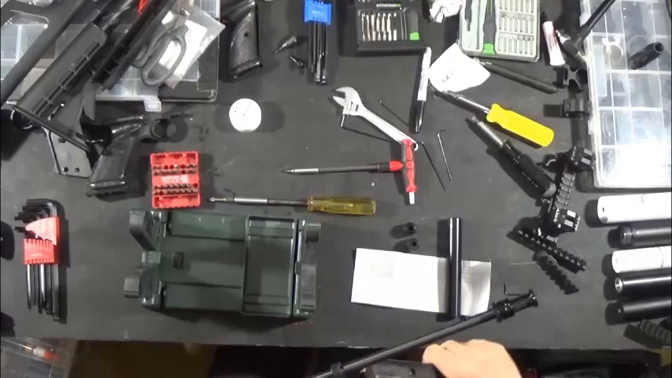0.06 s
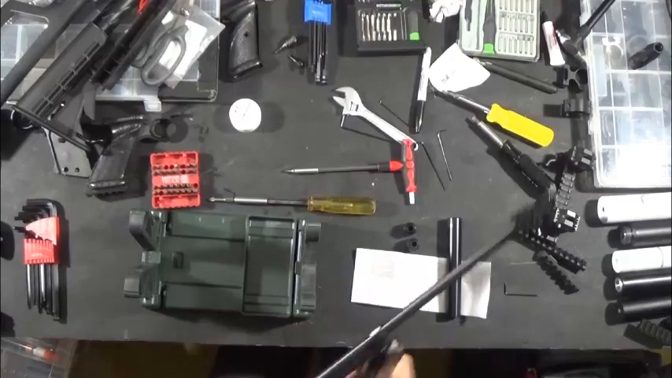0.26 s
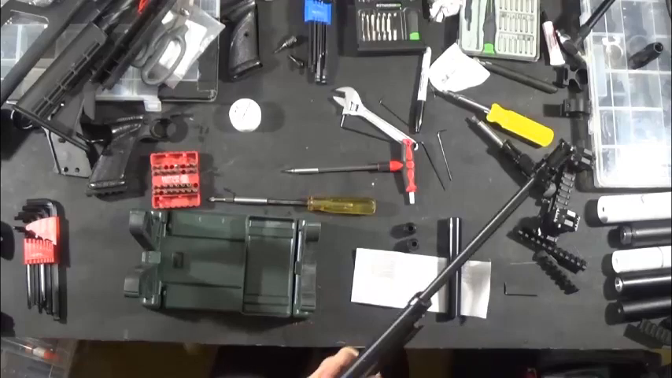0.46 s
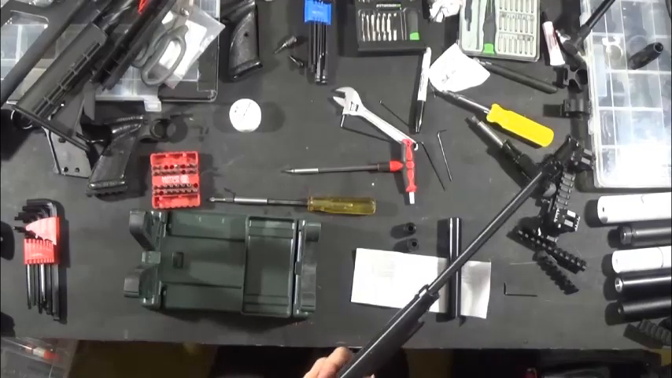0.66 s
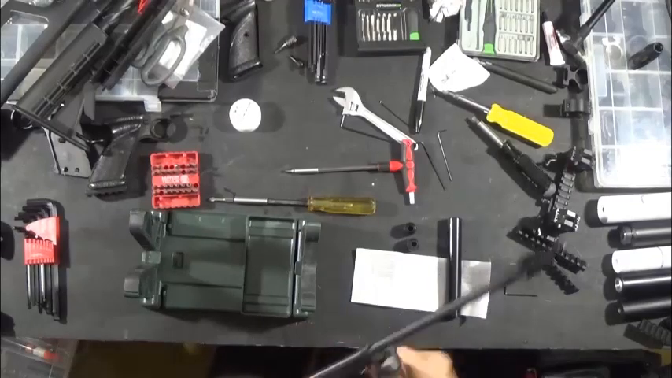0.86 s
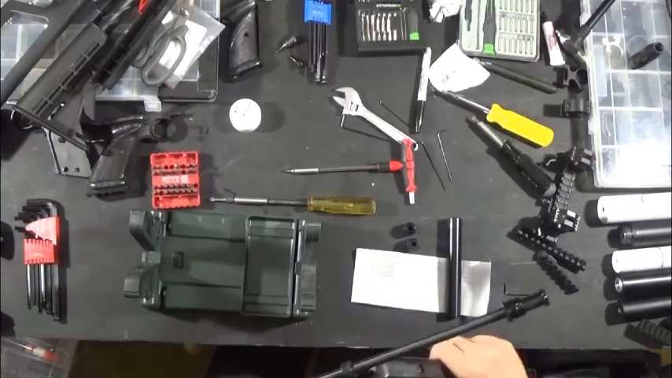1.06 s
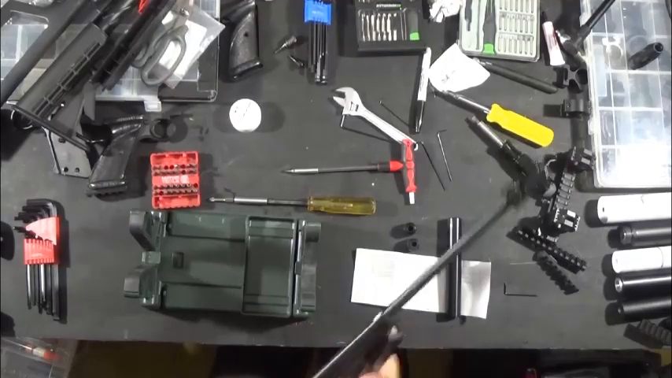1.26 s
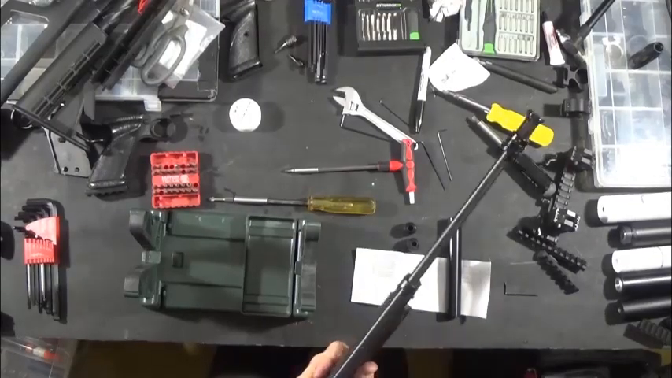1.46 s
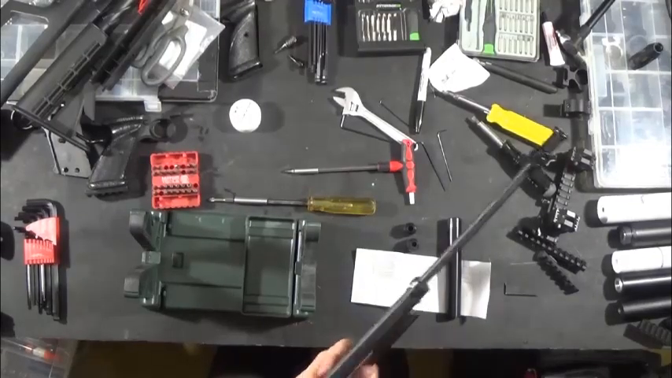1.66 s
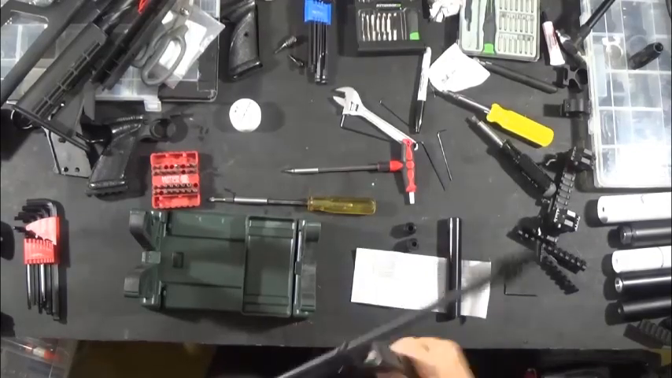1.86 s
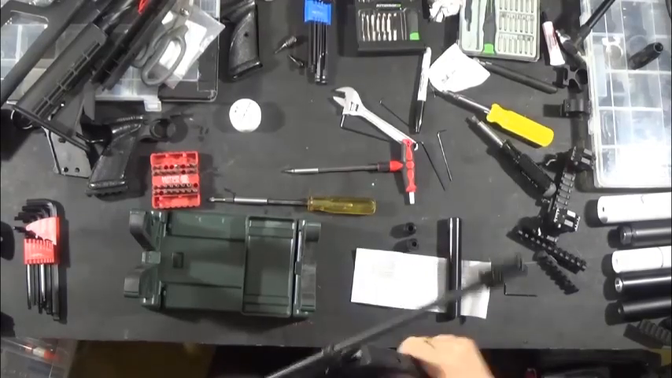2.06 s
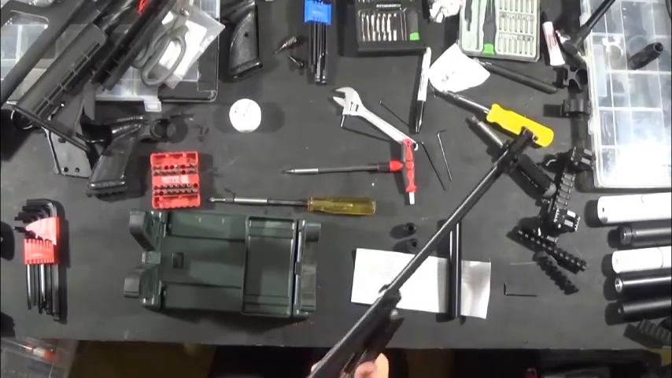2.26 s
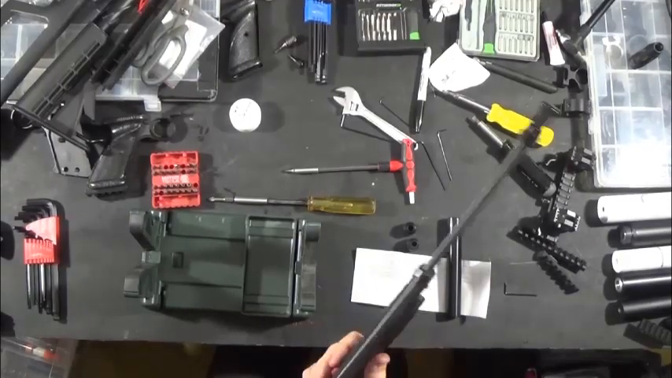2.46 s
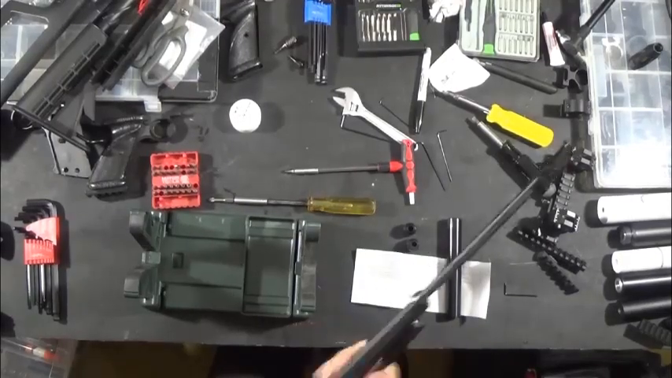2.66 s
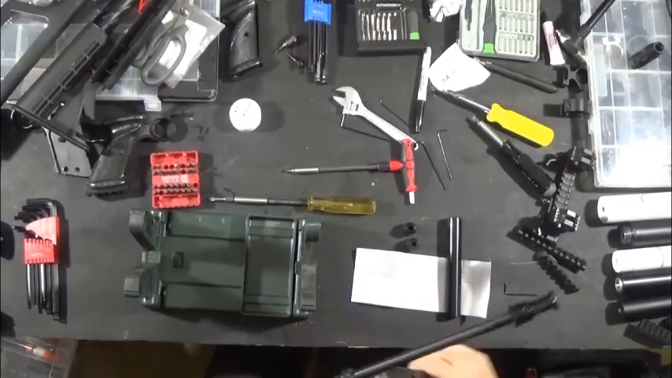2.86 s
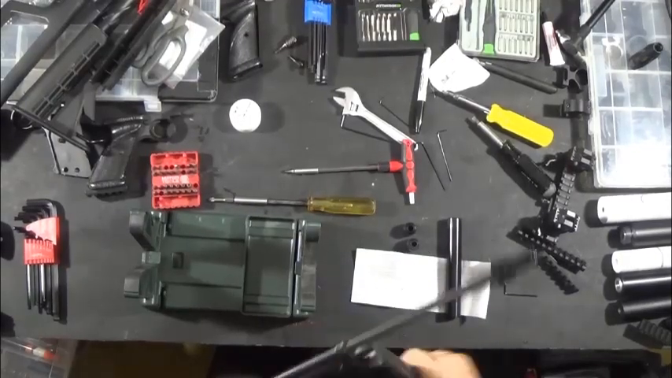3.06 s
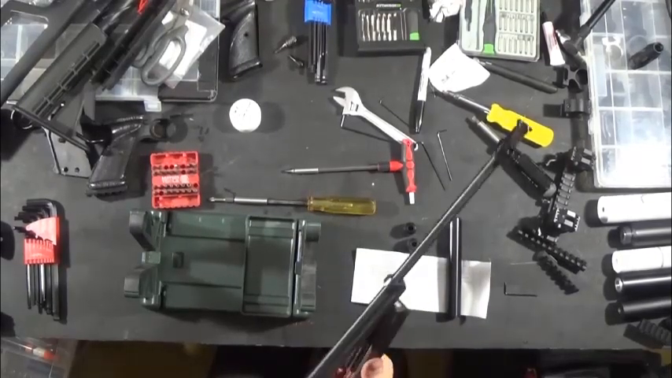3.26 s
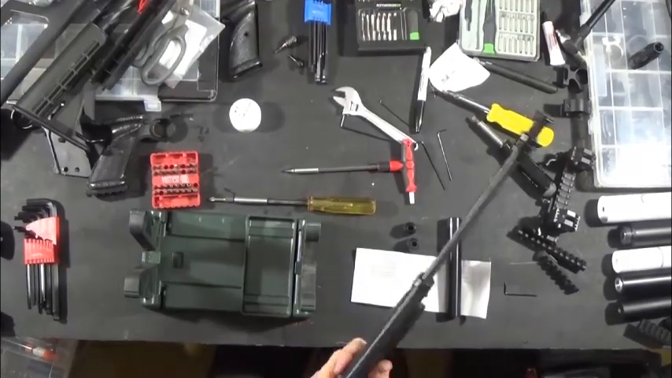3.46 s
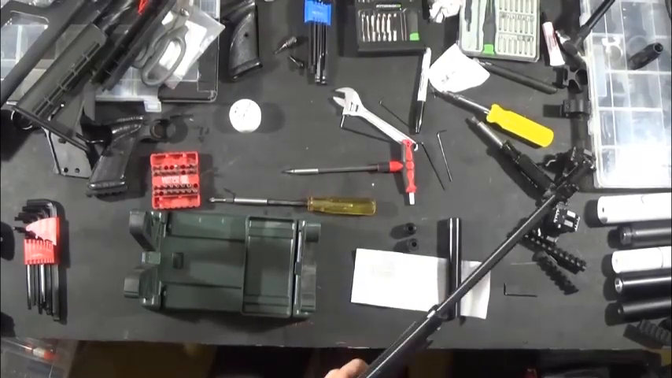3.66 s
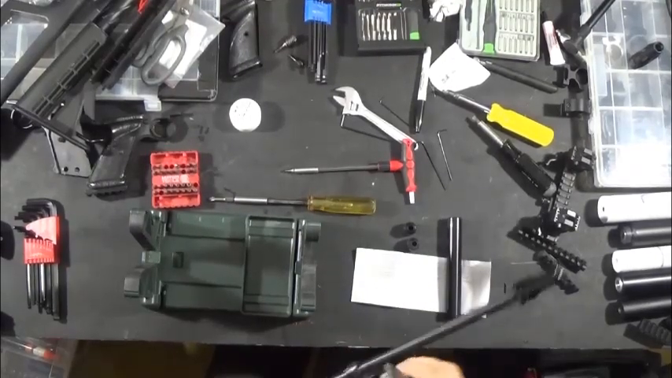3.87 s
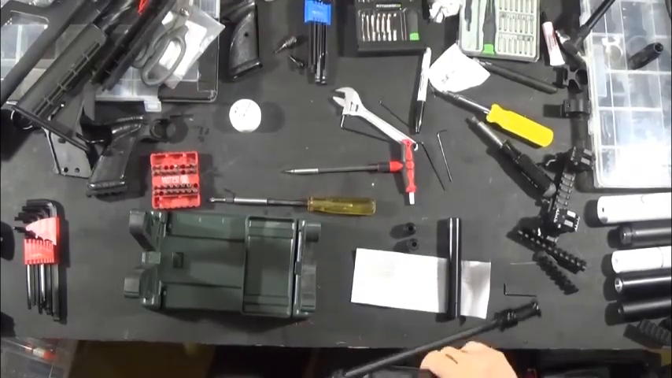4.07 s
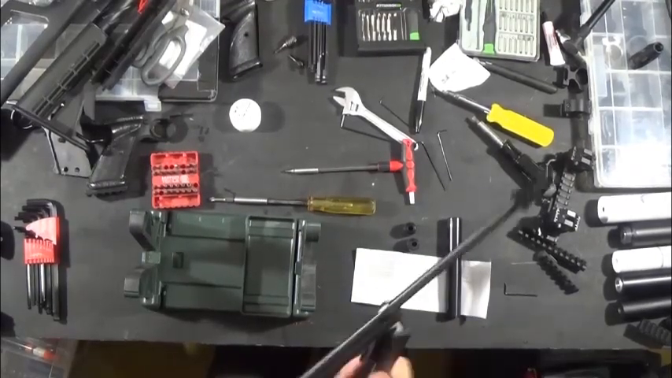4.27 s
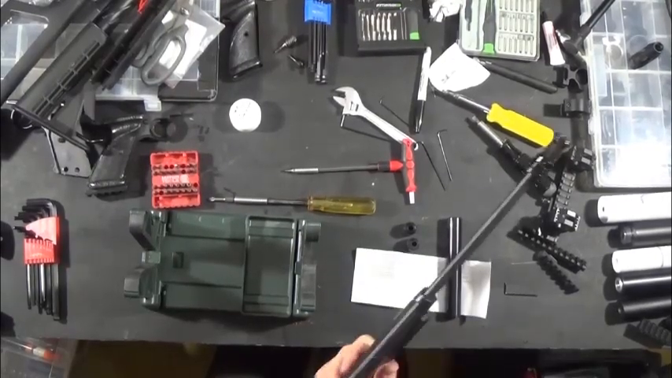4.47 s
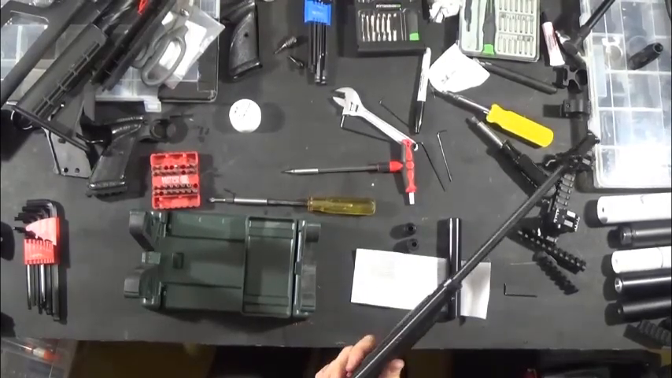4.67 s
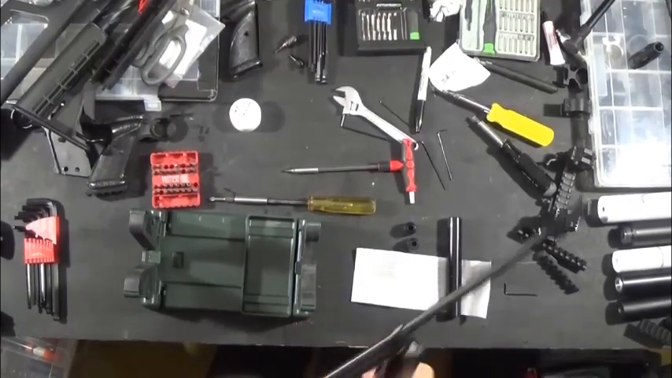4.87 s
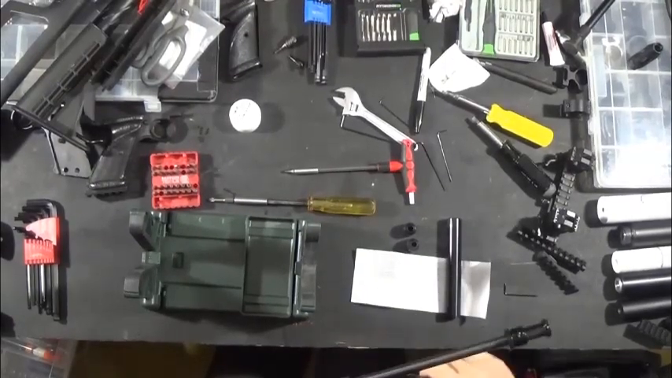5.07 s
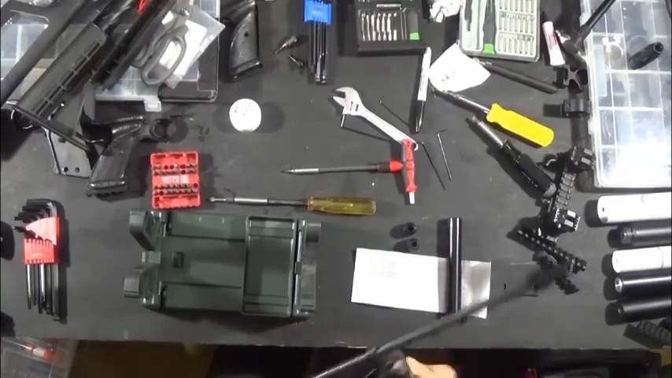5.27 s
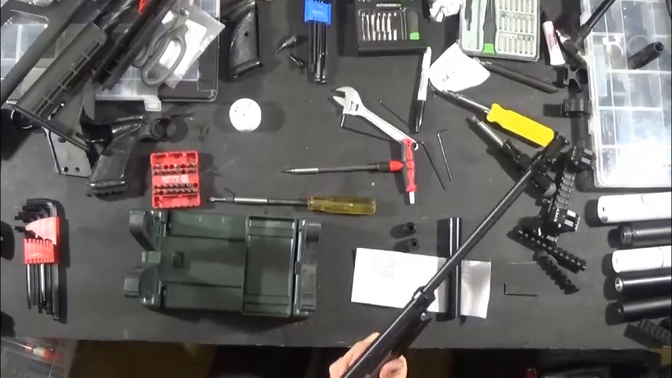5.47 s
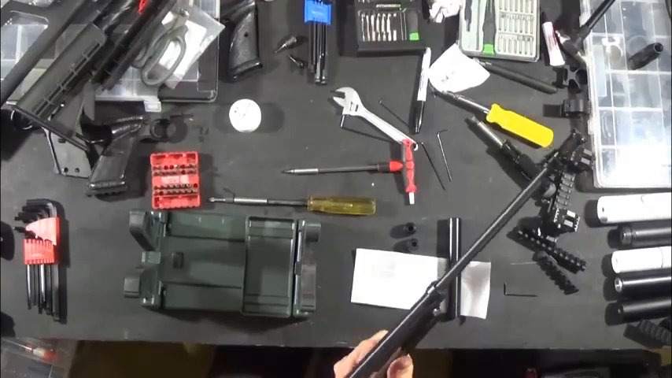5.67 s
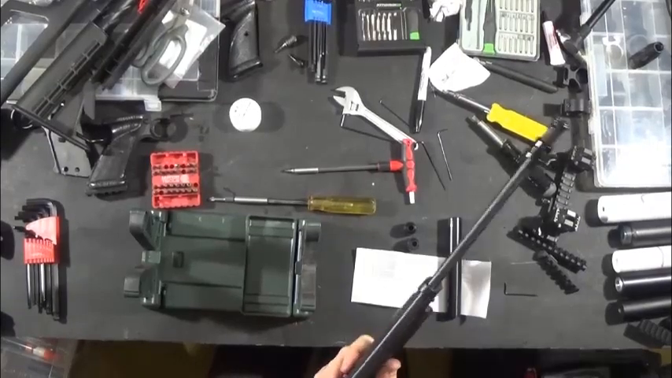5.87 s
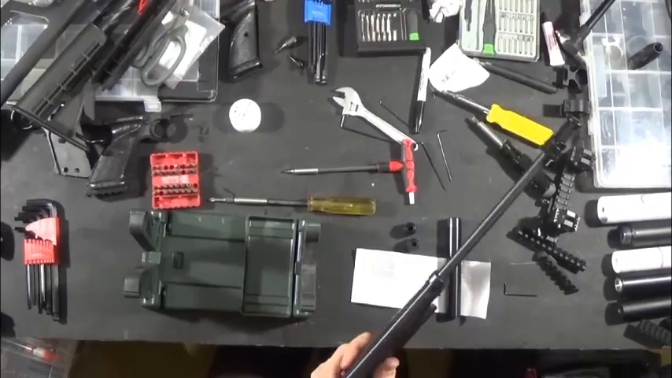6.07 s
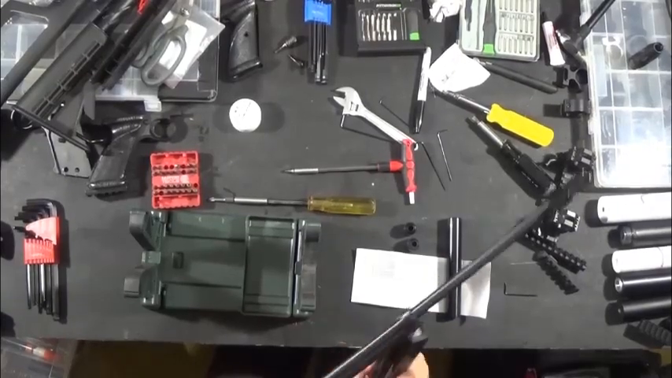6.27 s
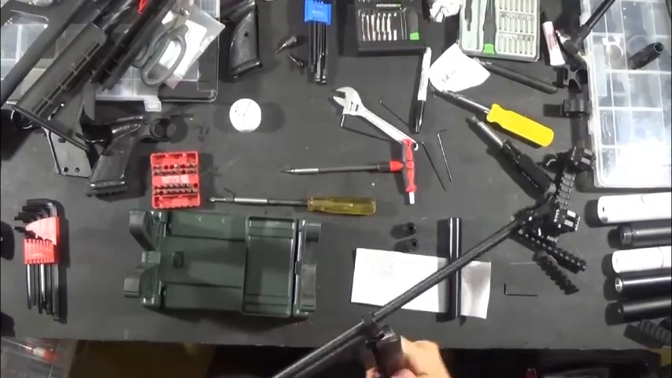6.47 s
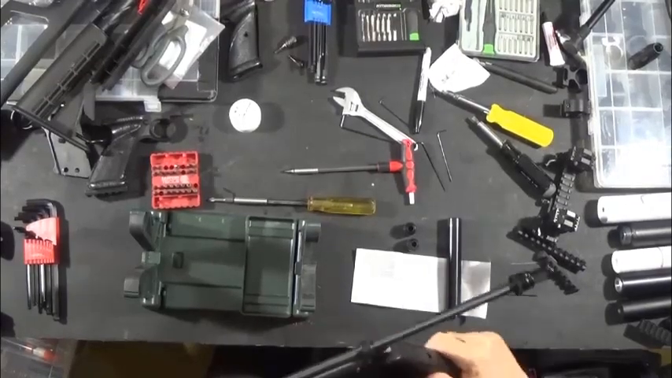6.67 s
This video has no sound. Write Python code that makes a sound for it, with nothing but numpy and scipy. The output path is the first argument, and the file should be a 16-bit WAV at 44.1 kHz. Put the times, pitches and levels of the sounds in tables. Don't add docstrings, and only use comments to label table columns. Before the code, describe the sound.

A close stereo pickup at a workshop bench, slightly left-leaning, with short room reflections and faint low traffic and engine rumble. It opens on a crisp metal click as the lever reaches its open stop. Air hisses and whistles softly past the seal, then a high dry hinge squeak at 0.48 s leads into a hard slam at 0.53 with a hollow rattle. A sharp snap at 0.75 releases the lever, and a softer stop clicks at 1.0. The cycle repeats: slams at 1.48, 2.43, 3.45, 4.52 and 5.88, each preceded by catch clicks and dull landings; snaps near 1.7, 2.7, 3.73, 4.81 and 6.21; open stops near 1.97, 2.94, 4.0 and 5.08. A second, weaker squeak comes at 2.4. Rattles last longest at 3.45 and 4.52. After 5.1 a longer quiet gap holds small grip thuds. The final opening ends in a gentle click at 6.69.

```python
import sys
import numpy as np
from scipy import signal
from scipy.fft import rfft, irfft, next_fast_len
from scipy.io import wavfile
from scipy.ndimage import uniform_filter1d, map_coordinates

SR = 44100
rng = np.random.default_rng(int(sys.argv[2]) if len(sys.argv) > 2 else 0)


def master(y):
    cut = np.clip(np.atleast_2d(y).T, -1, 1)
    pcm = np.round(cut * 32767)
    wavfile.write(sys.argv[1], SR, pcm.astype(np.int16))


def gain_from_db(level_db):
    decades = np.asarray(level_db, float) / 20
    return 10 ** decades


N = 296352

# (time [s], rumble level [dB])
TRAFFIC = [(0.0, -54.5), (2.13, -53.5), (2.47, -58.5), (2.99, -53), (3.74, -54.5), (4.3, -52.5),
           (6.57, -54.5), (6.72, -52.5)]
# (time [s], pitch [Hz], level [dB])
ENGINE = [(2.9, 118, -56), (3.2, 121.8, -66), (4.1, 119.9, -60), (4.35, 125.1, -52.5), (4.7, 126, -61),
          (5.15, 126.8, -66.5), (5.3, 119.8, -54), (5.6, 124.2, -62.5), (6.0, 119, -66)]
# (time [s], pitch [Hz], level [dB])
ENGINE_HIGH = [(4.4, 162.7, -88), (4.65, 168.3, -57), (5.1, 174.2, -60), (5.22, 173, -70)]
# (frequency [Hz], level [dB])
RUMBLE = [(12, -44), (20, -4.5), (65, 3), (102, 3.5), (140, 1.5), (195, -9), (300, -17), (390, -50.5),
          (660, -120)]
# (frequency [Hz], level [dB])
AIR = [(120, -47), (200, -10.5), (401, -6.5), (635, -11.5), (709, -11.5), (1370, -16), (1620, -15.5),
       (1740, -18), (16000, -29)]
# (frequency [Hz], time to fall 60 dB [s])
ROOM = [(300, 0.14), (1000, 0.78), (3000, 0.34), (8000, 0.12), (14000, 0.044)]

# (frequency [Hz], likeness [0 to 1])
ALIKE = [(40, .998), (70, .997), (125, .985), (250, .94), (500, .965), (1000, .75), (2000, .87),
         (4000, .74), (8000, .86), (12000, .975)]
# (frequency [Hz], left over right [dB])
LEAN = [(30, .2), (70, .6), (130, .8), (300, 1.6), (600, 1.1), (1300, .9), (2500, 0)]
# (frequency [Hz], gain [dB])
MICROPHONE = [(20, -5), (45, 0), (11000, 0), (13500, -1), (15000, -1), (16200, -8), (16500, -50)]

# (start [s], end [s], hiss at full speed [dB])
STROKES = [(0.058, 0.57, -57.5), (0.642, 1.037, -54), (1.067, 1.407, -61.5), (1.737, 1.986, -55),
           (2.028, 2.346, -58), (2.617, 2.997, -58), (2.986, 3.37, -60), (3.665, 4.06, -59),
           (4.084, 4.443, -59), (4.737, 5.09, -56), (5.086, 5.61, -61), (6.21, 6.75, -64)]
# (frequency [Hz], level [dB])
RUB = [(900, -7), (1800, -8.5), (2900, -3), (4500, -3), (6000, -11.5), (8000, -48)]
# (frequency [Hz], level [dB])
HISS = [(4500, -16), (6500, -2.5), (8500, 1), (10500, -4), (13000, -11), (16500, -25)]
# (middle [s], level [dB], pitch [Hz], width [Hz], half length [s])
WHISTLES = [(0.391, -54.5, 3060, 450, 0.09), (0.924, -53.5, 2770, 93, 0.018), (1.188, -62, 3970, 119, 0.01),
            (1.889, -53, 2780, 170, 0.024), (2.845, -56, 2400, 100, .008), (2.859, -52, 2780, 130, 0.012),
            (2.89, -59, 2750, 260, .022), (3.222, -63, 5000, 260, 0.03), (5.119, -54, 2910, 260, 0.0302),
            (3.885, -57, 6900, 500, 0.035), (3.912, -52, 2750, 150, 0.016), (4.998, -54, 2760, 180, .025),
            (6.532, -62, 2731, 180, 0.037)]
# (time [s], peak [dB], pitch [Hz], time to fall 60 dB [s])
HUMS = [
    (.62, -53, 1250, 0.5),
    (.76, -50, 905, 0.25),
]
# (pitch [Hz], level [dB], time to fall 60 dB [s])
TUBE = [(437, -2, 0.041), (829, -6.5, 0.087), (1208, -0.5, 0.072), (1605, 1.5, 0.044)]
# (time [s], pitch [Hz], level [dB])
SQUEAKS = [
    [(.450, 5800, -64), (.456, 5540, -38.5), (.4602, 5450, -14), (.4622, 5190, -21), (.470, 5310, -29),
     (.473, 5330, -18.5), (.478, 5270, -23)],
    [(.480, 5200, -20.5), (.4825, 5250, -18.5), (.4845, 5200, -7.5), (.4865, 5130, -13), (.488, 5020, -24),
     (.490, 4940, -14), (.492, 4840, -18.5), (.4935, 4850, -52)],
    [(2.378, 6050, -42), (2.386, 6030, -36), (2.390, 5850, -27.5), (2.394, 5530, -27), (2.3965, 5580, -16),
     (2.398, 5620, -32), (2.402, 5600, -28), (2.406, 5500, -50)],
]

# (pitch [Hz], level [dB], time to fall 60 dB [s])
STEEL = [(2400, 8, 0.26), (2960, 5.5, 0.058), (3290, -16, 0.079), (4400, -21, 0.03), (5200, -4.5, 0.036)]
# (pitch [Hz], level [dB], time to fall 60 dB [s])
PINS = [(7000, -13.5, .02), (8200, 1, 0.05), (8150, -4, 0.08), (8845, 10, 0.02), (9550, 4, 0.025)]
# (pitch [Hz], level [dB], time to fall 60 dB [s])
STOP_PIN = (8200, -32, .15)
# (pitch [Hz], level [dB], time to fall 60 dB [s])
STOP_BODY = [(1730, -1, 0.053), (2120, -2, 0.056), (2430, 10, 0.013)]
# (frequency [Hz], level [dB])
KNOCK = [(200, -24), (400, -9), (900, -2), (1600, -1), (2600, 1), (4000, -52)]
# (frequency [Hz], level [dB])
CRACK = [(900, -53.5), (1800, -2), (3000, 4.5), (4800, 6), (6500, -7.5), (9000, -51.5)]
# (frequency [Hz], level [dB])
SPARK = [(4000, -26), (6000, -5.5), (8500, 0.5), (10500, -5), (13000, -10.5), (16500, -53)]

# (pitch [Hz], width [Hz], level [dB])
HOLLOW = [(243, 27, -10), (365.5, 9.4, 6), (450, 47, 1.5), (576, 117, 3.5), (772, 28, 6), (1000, 100, -5)]
# (frequency [Hz], level [dB])
RATTLE = [(410, -52), (700, -4), (1620, -11), (1750, -6), (2020, -7.5), (3200, -1), (3500, -7.5),
          (3940, -3.5), (4490, -5), (5990, -7), (8530, -2.5), (13300, -24), (15400, -40), (16000, -70.5)]
# (pitch [Hz], width [Hz], lift [dB])
FRAME = [(3290, 180, 2), (3820, 270, 6.5), (8400, 570, -1), (9200, 580, 2.5)]
# (pitch [Hz], level [dB], delay [s], half length [s])
THUMP = [(375.6, -2.5, 0.0087, 0.014), (460, -2.5, 0.0081, 0.023), (614.7, -2, 0.023, 0.0045),
         (772.5, -9, 0.02, 0.0081)]
# (middle [s], peak [dB], pitch [Hz], half length [s])
CHIRPS = [(0.5388, -23, 3220, 0.0071), (0.541, -21, 8900, 0.0031), (0.562, -27, 2930, .005),
          (0.577, -31, 8400, .005), (.6106, -39, 3140, .004), (0.747, -24, 2800, .004),
          (0.761, -29, 3190, 0.0043), (1.388, -36, 3900, .004), (1.4876, -20.5, 3236, 0.0024),
          (1.4986, -20, 9000, 0.0026), (1.4991, -25, 3274, 0.0064), (1.521, -24, 3120, .004),
          (1.54, -36, 3290, 0.0076), (1.708, -24, 2826, 0.0043), (1.709, -28, 3900, 0.0036),
          (1.709, -30, 7740, 0.0062), (1.72, -34, 2360, 0.0063), (1.753, -35, 3970, .003),
          (2.373, -39, 2190, 0.014), (2.413, -23, 3150, .004), (2.441, -25.5, 3224, 0.015),
          (2.455, -29, 8740, .004), (2.4558, -24.5, 3300, 0.0056), (2.467, -24, 3260, 0.0045),
          (2.674, -38, 7140, .003), (2.673, -37.5, 1920, 0.0054), (2.688, -29, 2296, .004),
          (2.6974, -43, 4440, .003), (2.713, -30, 6300, .002), (2.716, -39.5, 1130, 0.0049),
          (3.381, -40.5, 3570, 0.015), (3.4631, -23, 3220, .004), (3.472, -20.5, 8700, 0.0037),
          (3.486, -29, 3270, .004), (3.729, -32, 2343, 0.0056), (3.757, -39, 2870, 0.02),
          (3.76, -35, 8270, .004), (4.468, -34, 3690, 0.0063), (4.475, -41, 2800, .005),
          (4.527, -17.5, 3230, 0.0046), (4.55, -21, 4090, 0.0076), (4.821, -23, 2350, 0.0043),
          (4.827, -36, 3070, 0.0045), (4.845, -34, 3140, .006), (4.86, -42, 2930, .005),
          (5.8798, -15.5, 9300, 0.0023), (5.885, -23, 3500, .004), (6.22, -30, 8100, .005),
          (6.26, -61, 2930, 0.021),
          (.457, -56, 830, .007), (.457, -56, 1650, .007), (.503, -31, 820, .006),
              (.495, -31, 850, .003), (5.829, -50, 3150, .012), (6.497, -47, 265, .015),
              (.795, -48, 880, .025), (5.092, -36, 2000, .004), (5.04, -54, 2950, .004)]

# (knock [dB], sparkle [dB], tail [dB], spike [dB], lasting note [dB])
STOP = (-16.5, -4, -16.5, -3, -34)
REBOUND = (-11, -0.5, -18.5, -5, -27)
CATCH = (-10.5, 4, -18, -4, -40.5)
LANDING = (-4, -10.5, -30, -8.5, -32.5)
SNAP = (-20, -1.5, -14, -1, -30.5)
PIN_TICK = (-12.5, 4.5, -16.5, -2.5, -37)
THUD = (-3.5, -5.5, -22.5, -5, -29)
SOFT_THUD = (5.5, -30, -17, -14, -49)
# (knock [dB], sparkle [dB], tail [dB], spike [dB])
DRY_TICK = (-19, -5, -36, 9.5)

# (time [s], peak [dB])
STOPS = [
    (.0014, -16),
    (1.0086, -22.5),
    (1.9674, -16),
    (2.942, -13.5),
    (4.003, -13.5),
    (5.0848, -15),
    (6.6891, -30),
]
# (time [s], peak [dB], loudest ring [Hz])
REBOUNDS = [(.131, -38.5, 6900), (.1406, -37, 6900), (1.092, -57, 6000), (1.110, -46, 7000),
            (1.1192, -31, 6300), (4.1186, -31.5, 2900), (4.127, -46, 4500), (5.192, -59, 4500),
            (5.2034, -31.5, 8700), (6.377, -41, 2800)]
# (time [s], peak [dB], loudest ring [Hz])
CATCHES = [(1.3837, -18, 3240), (1.422, -33, 3250), (1.461, -16.5, 5200), (2.3505, -16, 2310),
           (3.3709, -18, 3910), (4.462, -20.5, 2140), (4.472, -34, 2855)]
# (time [s], peak [dB], loudest ring [Hz])
LANDINGS = [(.3715, -31, 3300), (.4922, -11, 5200), (1.455, -9.5, 3000), (1.6516, -35, 5200),
            (2.4047, -8, 2430), (3.356, -35.5, 2320), (3.4224, -7.5, 2390), (4.3943, -44, 3290),
            (4.5003, -10.5, 5600), (4.5018, -7.5, 2410), (4.8466, -28, 3110), (5.8499, -19.5, 2430)]
# (time [s], peak [dB], loudest ring [Hz])
SNAPS = [(.4737, -23.5, 3600), (.4955, -13.5, 5690), (.7454, -9, 4930), (1.263, -42, 4730),
         (1.3231, -41.5, 3340), (1.704, -15.5, 2870), (1.7343, -17.5, 3710), (2.4144, -14, 6060),
         (2.6855, -23, 2340), (2.712, -21, 4880), (3.4323, -12.5, 4020), (3.7265, -9, 5100),
         (3.7631, -20.5, 2970), (4.4399, -41, 2230), (4.8136, -8, 4870), (6.2097, -9, 2518)]
# (time [s], peak [dB], loudest ring [Hz])
PIN_TICKS = [(.5232, -21.5, 3140), (1.1897, -45, 4000), (1.329, -45.5, 3300), (1.691, -31, 2600),
             (1.698, -30, 4500), (1.940, -37, 4560), (1.95, -30, 4810), (2.4268, -20, 4420),
             (2.667, -40, 1950), (2.677, -29, 4680), (2.7255, -29.5, 7000), (2.7425, -33.5, 4050),
             (2.921, -40, 6500), (2.927, -27.5, 5200), (3.9524, -37.5, 3000), (3.990, -50, 4464),
             (5.0466, -37.5, 6300), (5.8237, -58, 3260), (6.199, -34.5, 2790), (6.2754, -32, 8800)]
# (time [s], peak [dB], loudest ring [Hz])
THUDS = [(.352, -39.5, 3000), (1.877, -35.5, 2870), (2.2843, -39, 2410), (2.7894, -38, 3170),
         (4.1905, -41.5, 2070), (5.4271, -37.5, 2520), (5.4354, -41, 2406), (5.5727, -37.5, 2900)]
# (time [s], peak [dB], loudest ring [Hz])
SOFT_THUDS = [
    (6.475, -53.5, 1300),
    (6.49, -52.5, 1500),
]
# (time [s], peak [dB], loudest ring [Hz])
DRY_TICKS = [(.166, -46, 2900), (1.4814, -11, 4750), (1.7349, -9, 3700), (1.7605, -30, 4800),
             (3.262, -48, 2400), (5.873, -33, 4500)]
# (time of the stop [s], level [dB], swell [s])
SCRAPES = [(0.742, -32, 0.016), (1.003, -52, 0.021), (1.455, -38.5, 0.045), (1.696, -38, 0.02),
           (1.733, -36, 0.013), (2.403, -27, 0.026), (2.673, -36.5, 0.014), (2.712, -34.5, 0.036),
           (3.421, -38, 0.027), (3.718, -34.5, 0.0091), (4.002, -47, 0.0088), (4.5, -40, 0.045),
           (4.522, -27, 0.019), (4.809, -31, 0.009), (5.084, -50, 0.013), (5.875, -36.5, 0.029),
           (6.208, -26.5, 0.01)]
# (time [s], peak [dB], rattle level [dB], rattle hold [s])
SLAMS = [
    (0.5277, -6.5, -21, 0.019),
    (1.4842, -10.5, -18, 0.011),
    (2.4293, -9, -16.5, 0.019),
    (3.447, -6.5, -17.5, 0.026),
    (4.519, -7.5, -16.5, 0.029),
    (5.8786, -9.5, -18, 0.021),
]

BARREL_HZ, BARREL_T60_S = 2910, 0.33
RATTLE_T60_S = 0.29
BOOM_DB, THUMP_DB = -13, -11


def unit(x):
    return x / np.sqrt(np.mean(x ** 2) + 1e-20)


def along(points, hz):
    f, v = np.transpose(points)
    return np.interp(np.log(hz + 1), np.log(f + 1), v)


def curves(rows, t):
    s, *cols = np.transpose(rows)
    return [np.interp(t, s, c) for c in cols]


def colour(spectrum):
    return lambda hz: gain_from_db(along(spectrum, hz))


def wobble(rate, size):
    points = rng.standard_normal(int(size * rate / SR) + 4)
    return map_coordinates(points, [np.arange(size) * rate / SR])


def noise(gain, size):
    m = next_fast_len(size)
    hz = np.fft.rfftfreq(m, 1 / SR)
    turn = np.arccos(np.clip(along(ALIKE, hz), -1, 1)) / 2
    spread = [np.cos(turn), np.sin(turn)]
    mid, side = irfft(rfft(rng.standard_normal((2, m))) * gain(hz) * spread, m)[:, :size]
    return unit(np.array([mid + side, mid - side]))


def patchy(x, depth_db, tall, long):
    z = signal.stft(x, nperseg=256)[2]
    field = uniform_filter1d(rng.standard_normal(z.shape[1:]), tall, 0)
    field = uniform_filter1d(field, long, 1)
    return unit(signal.istft(z * gain_from_db(depth_db * unit(field)), nperseg=256)[1][:, :x.shape[1]])


def add(track, s, sound):
    part = track[..., max(round(s * SR), 0):][..., :sound.shape[-1]]
    part += sound[..., :part.shape[-1]]


def tone(rows, overtone_db, unsteady_db, rate):
    t = np.arange(N) / SR
    hz, db = curves(rows, t)
    db = uniform_filter1d(db, size=45)
    turn = 2 * np.pi * np.cumsum(hz) / SR
    on = (t > rows[0][0]) & (t < rows[-1][0])
    level = np.sqrt(2) * gain_from_db(db + unsteady_db * wobble(rate, N))
    return on * level * (np.sin(turn) + gain_from_db(overtone_db) * np.sin(2 * turn))


def workshop():
    rumble_db, = curves(TRAFFIC, np.arange(N) / SR)
    rumble = gain_from_db(rumble_db + 0.5) * noise(colour(RUMBLE), N)
    engine = tone(ENGINE, overtone_db=-11.5, unsteady_db=1.0, rate=13)
    engine = engine + tone(ENGINE_HIGH, overtone_db=-33, unsteady_db=1.5, rate=11.0)
    air_level = gain_from_db(-62.5 + 2.2 * wobble(1.0, N) + 1.96 * wobble(5.2, N))
    air = air_level * patchy(noise(colour(AIR), N), depth_db=1.5, tall=3, long=30)
    return rumble + air + engine


def room(x):
    hz, t, z = signal.stft(noise(np.ones_like, 16384), SR, nperseg=256)
    fade = gain_from_db(-60 * t / along(ROOM, hz)[:, None])
    tail = signal.istft(z * fade, SR, nperseg=256)[1]
    delayed = np.pad(x, (130, 0))[None]
    return signal.fftconvolve(delayed, tail / np.linalg.norm(tail[0]), axes=1)


def hums():
    out, t = np.zeros((2, N)), np.arange(16384) / SR
    sag = 0.3
    for s, db, hz, t60 in HUMS:
        fade = gain_from_db(db + 1.5 * wobble(70, len(t)) - 60 * t / t60) * (1 - np.exp(-t / 0.01))
        add(out, s, fade * np.sin(2 * np.pi * hz * (t - sag * t * t / 2)))
    return out


def whistles():
    out, t = np.zeros((2, N)), np.arange(-4096, 4096) / SR
    for s, db, hz, width, half in WHISTLES:
        bend = 1 + 0.0322 * np.tanh(1.48 * t / half + 1.1)
        turn = 2 * np.pi * np.cumsum(hz * bend) / SR

        def flutter():
            return noise(lambda f: 1 / (1 + (f / width) ** 2), len(t))

        swell = np.exp(-(t / np.where(t < 0, 0.83 * half, 1.9 * half)) ** 2)
        add(out, s + t[0], gain_from_db(db) * (flutter() * np.sin(turn) + flutter() * np.cos(turn)) * swell)
    return out


def piston():
    t = np.arange(N) / SR
    flow = gain_from_db(-70.5)
    for a, b, db in STROKES:
        speed = np.sin(np.pi * np.clip((t - a) / (b - a), 0, 1)) ** 2
        flow = flow + gain_from_db(db) * speed ** 0.72
    slam_tail = np.zeros(N)
    for s, _, rattle_db, _ in SLAMS:
        slam_tail += (t > s) * gain_from_db(rattle_db - 12.5 - 60 * np.abs(t - s) / 0.38)
    rub = patchy(noise(colour(RUB), N), depth_db=1.8, tall=4, long=16)
    hiss = patchy(noise(colour(HISS), N), depth_db=1.8, tall=12, long=24)
    return (gain_from_db(-4) * flow + slam_tail) * rub + flow * hiss


def squeaks():
    out = np.zeros((2, N))
    for rows in (SQUEAKS[0] + SQUEAKS[1], SQUEAKS[2]):
        song = tone(rows, overtone_db=-30, unsteady_db=0.7, rate=300)
        start = round(rows[0][0] * SR)
        add(out, 0, song)
        add(out, rows[0][0], gain_from_db(-17) * room(song[start:start + 4096]))
    return out


def clatter(f):
    lift = sum(db / (1 + ((f - c) / w) ** 2) for c, w, db in FRAME)
    return gain_from_db(along(RATTLE, f) + lift)


def scrapes():
    out, t = np.zeros((2, N)), np.arange(-4096, 4096) / SR
    for s, db, swell in SCRAPES:
        shape = np.where(t < 0, gain_from_db(16 * t / swell), gain_from_db(-60 * t / 0.09))
        grit = gain_from_db(3.5 * wobble(700, len(t)))
        rubbing = patchy(grit * noise(clatter, len(t)), depth_db=-3.0, tall=3, long=3)
        add(out, s + t[0], gain_from_db(db) * shape * rubbing)
    return out


def ring(modes, t):
    out = 0
    for hz, db, t60 in modes:
        fade = gain_from_db(db + rng.normal(0, 3.3) - 60 * t / t60)
        out = out + fade * np.sin(2 * np.pi * hz * (1 + rng.normal(0, 0.0157)) * t)
    return out


def chirps():
    out, t = np.zeros((2, N)), np.arange(-3000, 3000) / SR
    bounces = [(s + 0.0135, db - 19.5, BARREL_HZ, 0.004) for s, db in STOPS]
    for s, db, hz, half in CHIRPS + bounces:
        turn = 2 * np.pi * np.cumsum(hz * (1 + 0.0065 * wobble(153, len(t)))) / SR
        turn = turn + rng.normal(0, 0.16) * np.array([[1], [-1]])
        swell = np.exp(-(t / np.where(t < 0, 0.53 * half, 1.35 * half)) ** 2)
        note = gain_from_db(db) * swell * np.sin(turn)
        begin = s + t[0]
        add(out, max(begin, 0), note[:, max(round(-begin * SR), 0):])
    after = t[t >= 0]
    for s, db in STOPS:
        add(out, s, gain_from_db(db + 4.3 * wobble(120, len(after))) * ring([STOP_PIN], after))
        add(out, s, gain_from_db(db - 17.5) * ring(STOP_BODY, after) * (1 - np.exp(-after / 0.0014)))
    return out


def contact(knock_db, spark_db, tail_db, spike_db, ring_hz):
    t = np.arange(10800) / SR

    def burst(gain, t60, rise):
        return noise(gain, len(t)) * gain_from_db(-60 * t / t60) * (1 - np.exp(-t / rise))

    def struck(f):
        return colour(CRACK)(f) * (1 + 6.35 / (1 + ((f - ring_hz) / 120) ** 2))

    def barrel(f):
        return colour(CRACK)(f) * (1 + 2.0 / (1 + ((f - 2980) / 160) ** 2))

    def click(f):
        return colour(CRACK)(f) + gain_from_db(spark_db) * colour(SPARK)(f)

    steel_modes = STEEL + [(ring_hz, 12, 0.045), (ring_hz, 18, 0.004)]
    steel = burst(struck, 0.022, 0.0003) + gain_from_db(-36.5) * ring(steel_modes, t)
    pins = burst(colour(SPARK), 0.011, 0.000092) + gain_from_db(-13) * ring(PINS + [(9270, 8.2, 0.013)], t)
    knock = burst(colour(KNOCK), 0.019, 0.0011) + gain_from_db(-13.5) * ring(TUBE, t)
    tail = burst(barrel, 0.21, 0.00149)
    tail += gain_from_db(spark_db) * burst(colour(SPARK), 0.19, 0.0018)
    tail += gain_from_db(knock_db + 10.5) * burst(colour(KNOCK), 0.26, 0.002)
    tail = tail * gain_from_db(2.2 * wobble(420, len(t)))
    spike = burst(click, 0.0041, 0.000148)
    blow = gain_from_db(spike_db) * spike / np.abs(spike).max() + gain_from_db(-9.0) * steel
    blow += gain_from_db(spark_db - 8.0) * pins + gain_from_db(knock_db - 3.0) * knock
    return blow + gain_from_db(tail_db - 6.0) * tail


def clicks():
    out, t = np.zeros((2, N)), np.arange(8192) / SR
    stops = [(s, db, BARREL_HZ) for s, db in STOPS]
    kinds = [(stops, STOP), (REBOUNDS, REBOUND), (SOFT_THUDS, SOFT_THUD), (CATCHES, CATCH),
             (LANDINGS, LANDING), (SNAPS, SNAP), (PIN_TICKS, PIN_TICK), (THUDS, THUD)]
    for rows, (*kind, note_db) in kinds:
        for s, db, ring_hz in rows:
            fade = gain_from_db(2.3 * wobble(140, len(t)) - 60 * t / BARREL_T60_S)
            turn = 2 * np.pi * np.cumsum(ring_hz * (1 + 0.025 * wobble(200, len(t)))) / SR
            add(out, s, gain_from_db(db) * contact(*kind, ring_hz))
            add(out, s, gain_from_db(db + note_db) * fade * np.sin(turn))
    for s, db, ring_hz in DRY_TICKS:
        add(out, s, gain_from_db(db - 60 * t / 0.012) * contact(*DRY_TICK, ring_hz)[:, :len(t)])
    return out


def cavity(f):
    out = 0
    for k, (c, w, db) in enumerate(HOLLOW):
        out = out + (-1) ** k * gain_from_db(db) * 1j * f * w / (c * c - f * f + 1j * f * w)
    return out


def ticking(size):
    rate, lift_db = 220, 0
    hits = (rng.random(size) < rate / SR) * rng.exponential(1, size)
    return 1 + (gain_from_db(lift_db) - 1) * signal.lfilter([1], [1, -np.exp(-1 / (0.0011 * SR))], hits)


def thump(t):
    out = 0
    for hz, db, delay, half in THUMP:
        swell = gain_from_db(db + rng.normal(0, 1.0)) * np.exp(-((t - delay) / half) ** 2)
        out = out + swell * np.sin(2 * np.pi * hz * (1 + rng.normal(0, 0.015)) * t)
    return out


def slams():
    out, t = np.zeros((2, N)), np.arange(16384) / SR
    for s, db, rattle_db, hold in SLAMS:
        first = contact(knock_db=-11.5, spark_db=3.0, tail_db=-29.5, spike_db=-0.5, ring_hz=3840)
        second = contact(knock_db=-14.5, spark_db=0.5, tail_db=-18, spike_db=1.0, ring_hz=3290)
        add(out, s, gain_from_db(db - 2.0) * first)
        add(out, s + 0.0018, gain_from_db(db - 3.5) * second)
        over = 0.012 * np.logaddexp(0, (t - hold) / 0.0095)
        fade = gain_from_db(-60 * over / RATTLE_T60_S) * (1 - np.exp(-t / 0.012))
        chatter = ticking(len(t)) * gain_from_db(0.39 * wobble(928, len(t)) + 0.41 * wobble(126, len(t)))
        rattle = patchy(chatter * noise(clatter, len(t)), depth_db=1.5, tall=3, long=4)
        boom = (1 - np.exp(-t / 0.0045)) * noise(cavity, len(t))
        add(out, s, fade * gain_from_db(rattle_db) * rattle)
        add(out, s, fade * gain_from_db(rattle_db + BOOM_DB) * boom)
        add(out, s, gain_from_db(rattle_db + THUMP_DB) * (1 - np.exp(-t / 0.0038)) * thump(t))
    return out


def scene():
    no_bass = signal.butter(3, 230, "highpass", fs=SR, output="sos")
    air = hums() + whistles() + piston()
    metal = squeaks() + scrapes() + chirps() + clicks() + slams()
    return workshop() + signal.sosfilt(no_bass, air + metal)


def low_pass(x):
    return signal.sosfilt(signal.butter(12, 16460, fs=SR, output="sos"), x)


def record(dry):
    m = next_fast_len(N + 4096)
    hz = np.fft.rfftfreq(m, 1 / SR)
    gain_db = along(MICROPHONE, hz) + along(LEAN, hz) * [[0.5], [-0.5]]
    heard = irfft(rfft(dry, m) * gain_from_db(gain_db), m)[:, :N]
    keep = np.exp(-1 / (0.006 * SR))
    power = signal.lfilter([1 - keep], [1, -keep], np.mean(heard ** 2, 0))
    ducked = heard / (1 + power / gain_from_db(-12.0) ** 2) ** 0.42
    return low_pass(ducked)


dry = scene()
out = record(dry)
master(out)
```